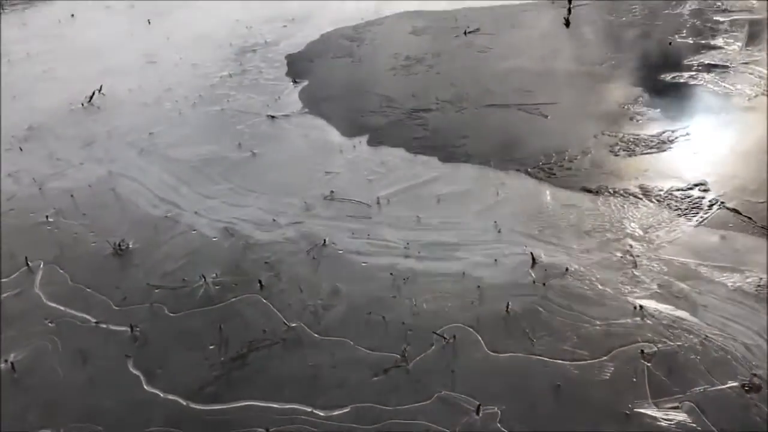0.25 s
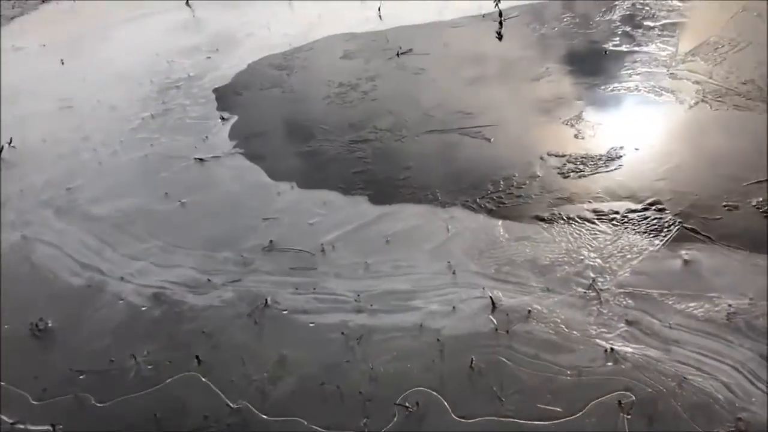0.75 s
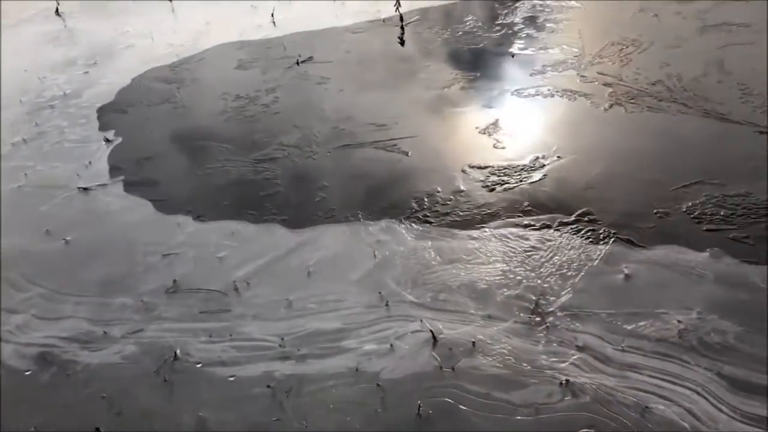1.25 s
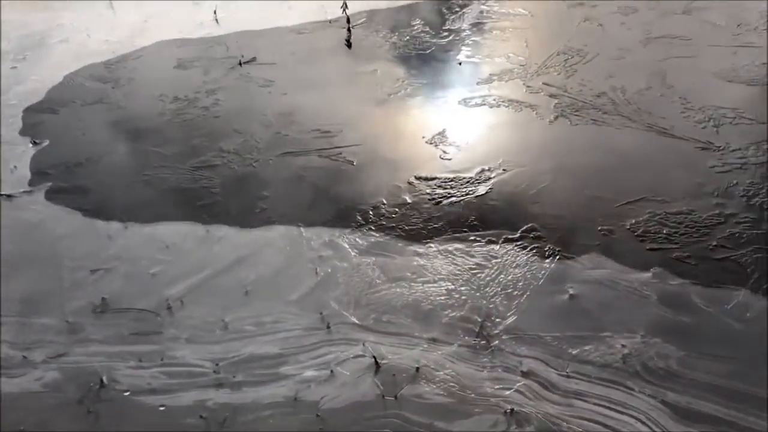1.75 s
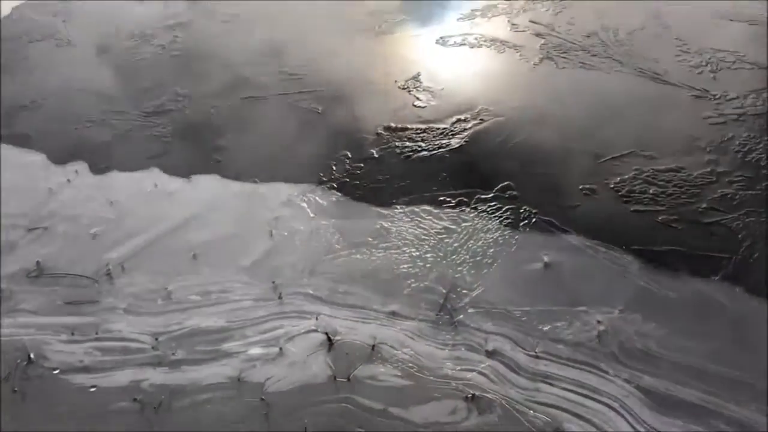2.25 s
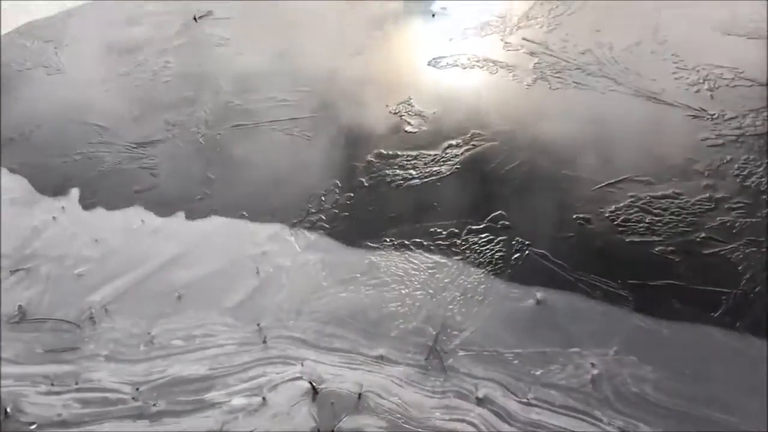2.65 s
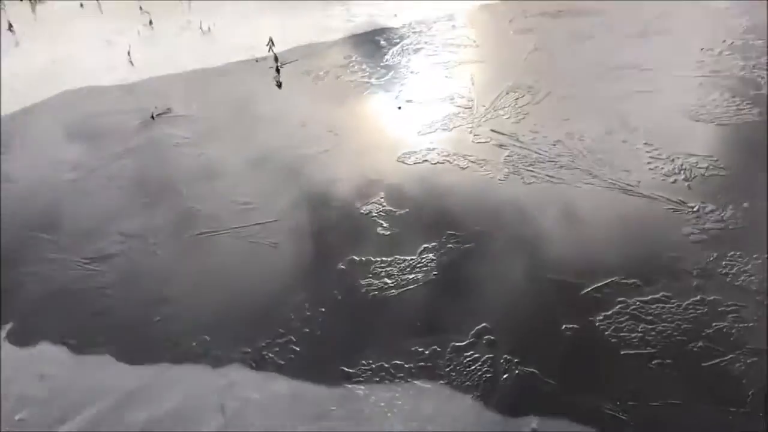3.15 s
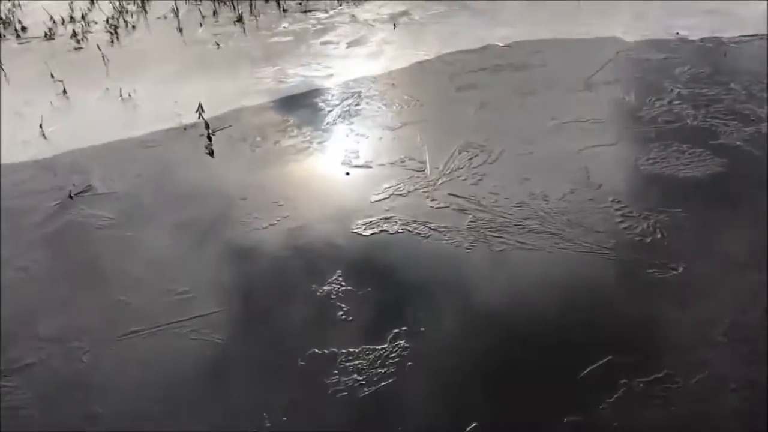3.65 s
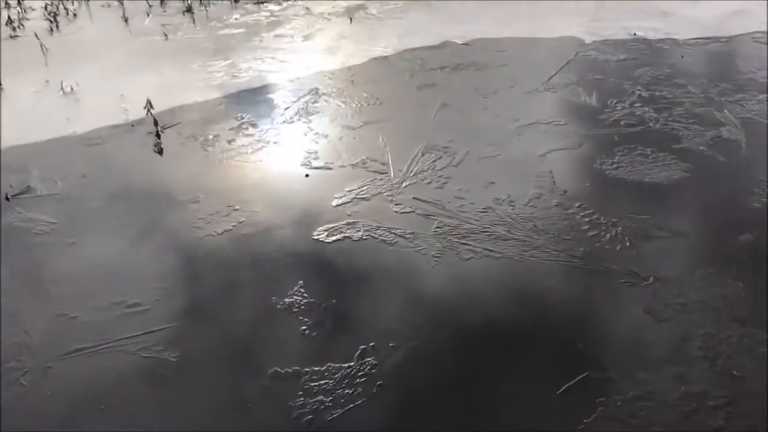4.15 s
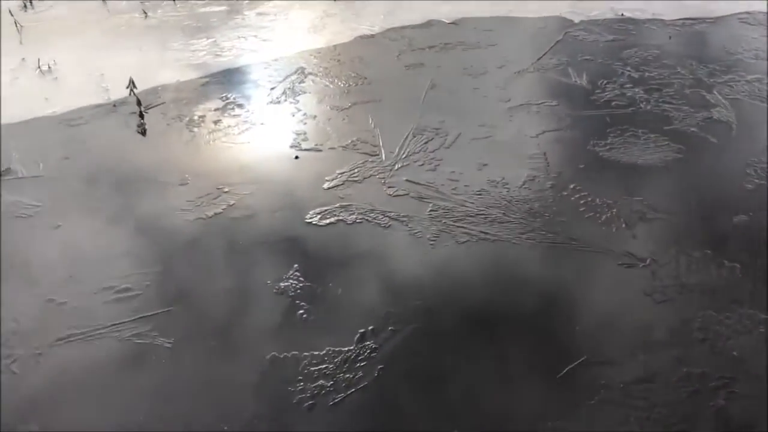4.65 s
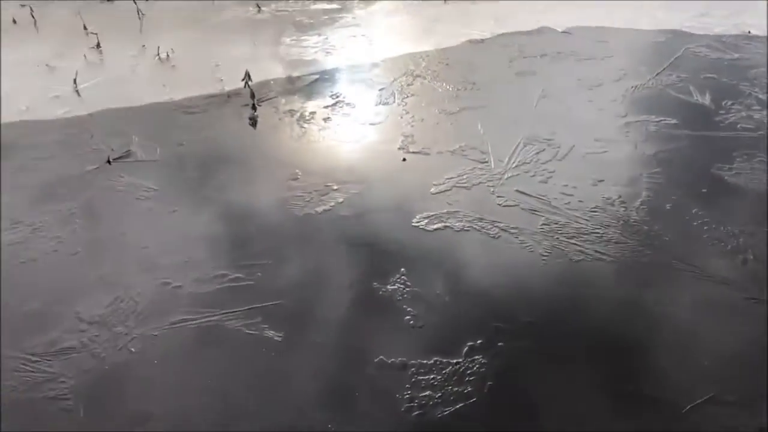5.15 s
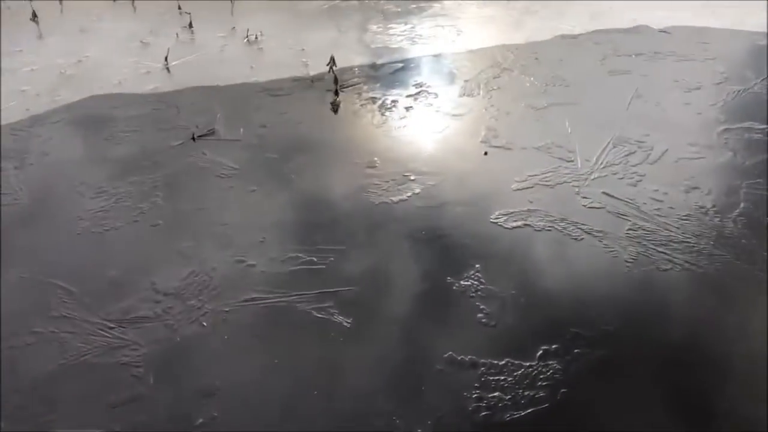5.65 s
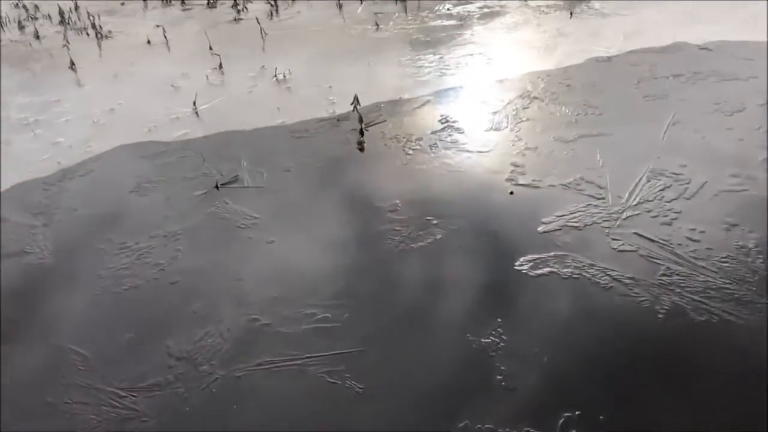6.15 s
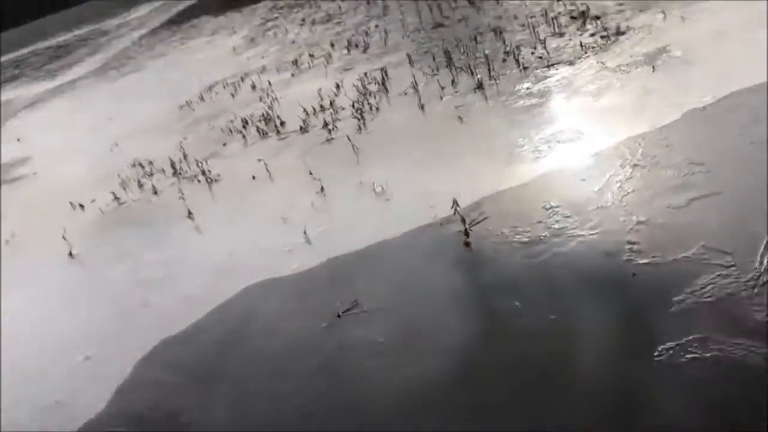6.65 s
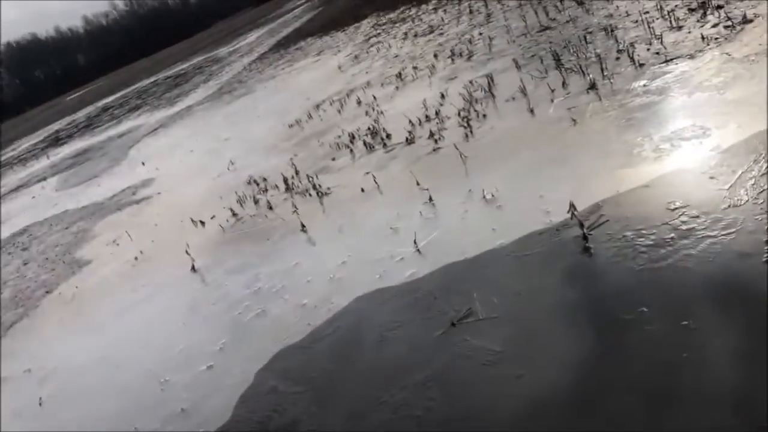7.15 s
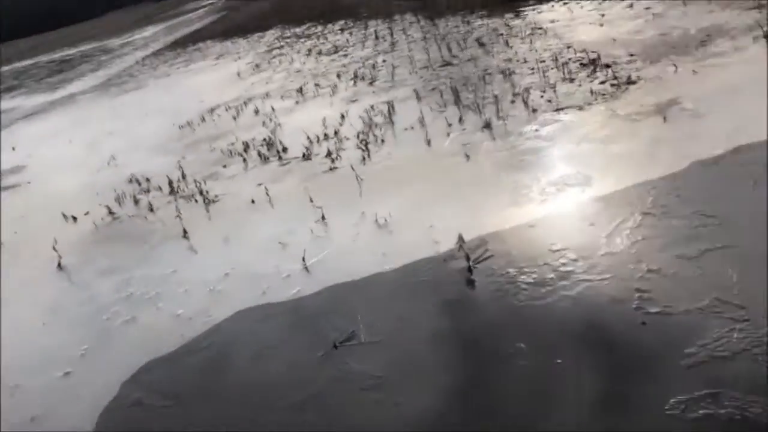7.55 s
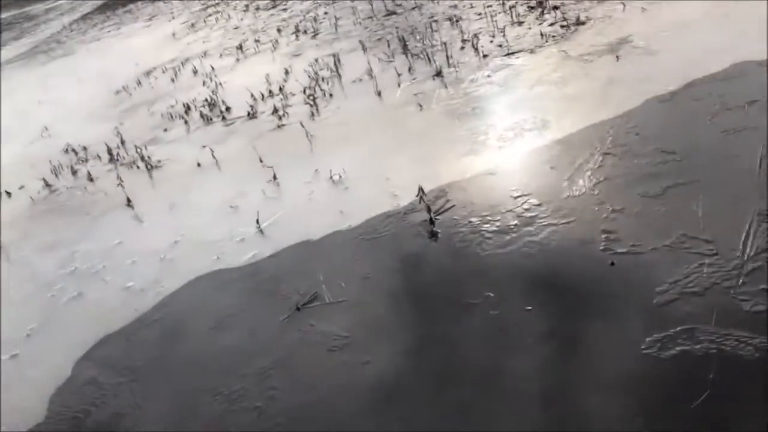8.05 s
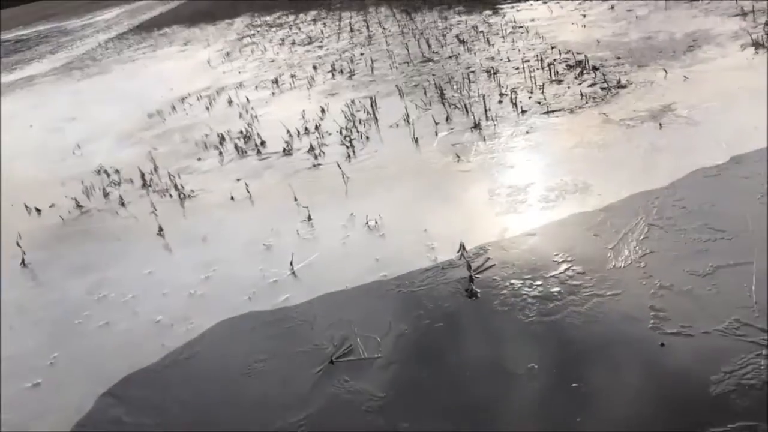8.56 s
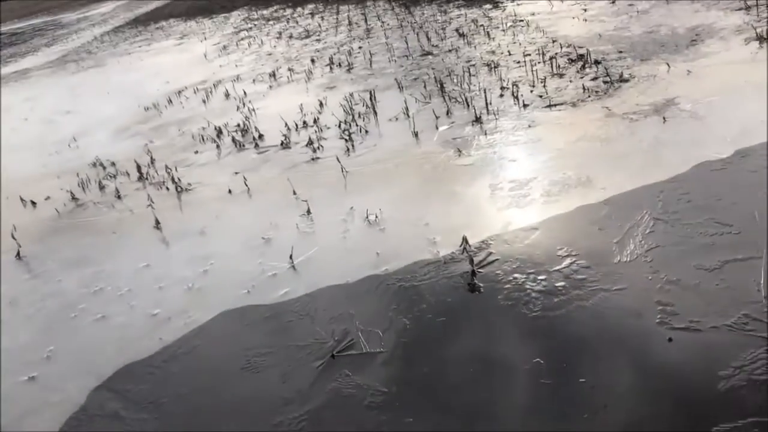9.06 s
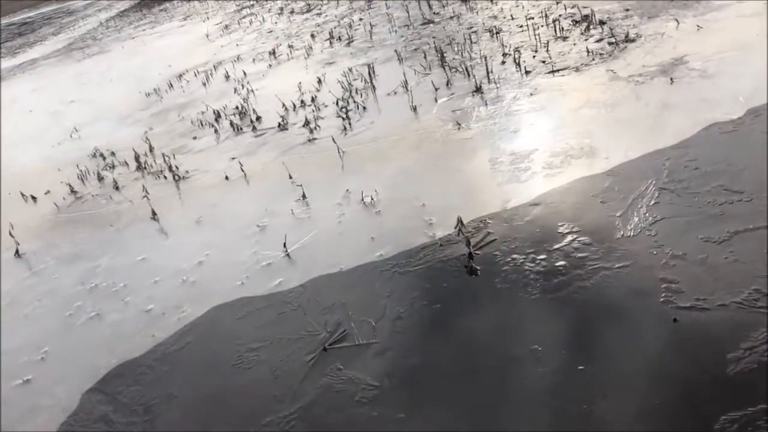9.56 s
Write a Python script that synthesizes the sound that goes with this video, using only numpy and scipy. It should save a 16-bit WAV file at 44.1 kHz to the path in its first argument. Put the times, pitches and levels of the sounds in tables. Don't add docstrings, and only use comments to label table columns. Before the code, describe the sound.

Close crunching and snapping of thin ice underfoot, with hollow thuds, ticking splinters, watery plops and light wind rumble on the microphone.

```python
import sys
import numpy as np
from scipy import signal
from scipy.fft import rfft, irfft, next_fast_len
from scipy.io import wavfile
from scipy.ndimage import uniform_filter1d

SR = 44100
rng = np.random.default_rng(int(sys.argv[2]) if len(sys.argv) > 2 else 0)


def attenuation_scalar(level_db):
    decades = np.asarray(level_db, float) / 20
    return 10 ** decades


def wav_out(sig):
    wavfile.write(sys.argv[1], SR, np.round(np.clip(np.atleast_2d(sig).T, -1, 1) * 32767).astype(np.int16))


N = 432621
REST_DB = -67.5

# (frequency [Hz], level [dB per Hz])
SHARD_SPECTRUM = [(880, -15.5), (1500, 1.5), (4170, -3.5), (5360, 1), (6490, 0.5), (15100, -5), (16000, 2),
                  (16500, -5.5)]


def evened(x):
    return x / np.sqrt(np.mean(x ** 2) + 1e-20)


def add(mix, s, sound):
    part = mix[round(s * SR):][:len(sound)]
    part += sound[:len(part)]


def curve(table):
    return attenuation_scalar(np.interp(np.arange(N) / SR, *np.transpose(table)))


def colour(x, points):
    size = next_fast_len(len(x))
    f, db = np.transpose(points)
    hz = np.fft.rfftfreq(size, 1 / SR) + 1
    gain = attenuation_scalar(np.interp(np.log(hz), np.log(f), db))
    return irfft(rfft(x, size) * gain, size)[:len(x)]


def drift(per_s):
    knots = np.tanh(0.7 * rng.standard_normal(4000))
    return evened(np.interp(np.arange(N) / SR * per_s, np.arange(len(knots)), knots))


def clicks(per_s, spread_db):
    size = attenuation_scalar(spread_db * np.minimum(rng.exponential(1, N), 5))
    sign = rng.choice([-1., 1.], N)
    return size * sign * (rng.random(N) < per_s / SR)


def grains(hz_lo, hz_hi, cycles, per_s, spread_db, glide, count):
    t, out = np.arange(2048) / SR, np.zeros(N)
    train = clicks(per_s, spread_db)
    which = rng.integers(0, count, N)
    for k, hz in enumerate(np.geomspace(hz_lo, hz_hi, count)):
        tone = np.sin(2 * np.pi * hz * t * (1 + glide * hz * t))
        wavelet = tone * np.exp(-3 * hz * t / cycles)
        out += signal.oaconvolve(train * (which == k), wavelet / np.linalg.norm(wavelet))[:N]
    return evened(out)


def crackle(per_s, spread_db, t60, clump_db, clumps_per_s, points):
    t = np.arange(1500) / SR
    snaps = clicks(per_s, spread_db) * attenuation_scalar(clump_db * drift(clumps_per_s))
    power = signal.oaconvolve(snaps ** 2, attenuation_scalar(-120 * t / t60))[:N]
    return evened(colour(np.sqrt(abs(power)) * rng.standard_normal(N), points))


def wind():
    # (time [s], level [dB])
    gusts = [(0.0, -33.5), (0.38, -54), (0.66, -36), (1.77, -50.5), (1.86, -40), (2.19, -50.5), (3.01, -52),
             (3.08, -47), (3.61, -50.5), (4.61, -47.5), (5.3, -48), (7.27, -48.5), (7.73, -58),
             (8.06, -42.5), (8.61, -50), (8.8, -31.5), (9.29, -52), (9.81, -44.5)]
    # (frequency [Hz], level [dB per Hz])
    rumble = [(12, -46), (20, -11), (43, 1.5), (65, 8), (121, -1), (146, -11), (250, -28), (320, -84.5)]
    lumps = attenuation_scalar(3.6 * drift(9))
    return curve(gusts) * evened(colour(rng.standard_normal(N), rumble) * lumps)


def field():
    # (frequency [Hz], level [dB per Hz])
    air = [(59, -52), (100, 11.5), (240, -24), (884, -8), (3940, -11), (12800, -31), (15100, -17),
           (16500, -67)]
    return attenuation_scalar(-59) * evened(colour(rng.standard_normal(N), air)) * attenuation_scalar(1.3 * drift(1.7))


def effort(wet):
    # (peak time [s], build-up [s], settling [s], effort [dB],
    # wetness of water over shards [dB])
    shifts = [(0.15, 0.2, 1, -51.5, 2.5), (0.82, 0.34, 0.53, -44.5, -2.5), (0.89, .1, 0.15, -49, 10),
              (1.44, 0.14, 0.46, -60.5, 15.5), (2.2, 0.044, .08, -61, 4), (2.02, 0.19, 0.39, -34.5, -2.5),
              (2.62, 0.44, 0.19, -47, 1.5), (2.74, 0.21, 0.37, -45.5, 4), (3.33, 0.48, 0.4, -39, 4.5),
              (3.47, 0.1, 0.83, -51.5, -3), (3.72, 0.14, 0.37, -60.5, 11.5), (4.1, 0.36, 1, -50.5, -3),
              (4.5, 0.23, 0.87, -62, 13.5), (4.93, 0.05, 0.22, -41.5, 0.5), (5.25, 0.22, 0.26, -29.5, 6),
              (5.42, 0.09, 0.27, -40.5, 0.5), (5.55, .2, 0.6, -45.5, -4), (6.09, 0.12, 0.11, -40, -24),
              (6.3, 0.46, 1, -50.5, 8.5), (6.796, 0.0037, 0.07, -33.5, -3), (6.901, 0.011, 0.15, -36.5, -3),
              (7.16, .03, .3, -52, -23), (7.4, 0.4, 0.9, -35.5, 4.5), (7.53, 0.064, 0.15, -41, 12),
              (7.9, 0.056, 0.24, -51, 9.5), (8.21, 0.2, 0.22, -50.5, 11), (8.52, 0.14, 1, -58, 13),
              (8.62, 0.13, .4, -47, 10.5), (8.9, 1, 0.77, -47.5, 8.5), (9.4, 0.77, 0.12, -55.5, 1)]
    range_db = 25
    t = np.arange(0, N + 64, 64) / SR
    power = attenuation_scalar(REST_DB) ** 2
    for s, build_s, settle_s, db, wet_db in shifts:
        away = np.where(t < s, (s - t) / build_s, (t - s) / settle_s)
        power = power + attenuation_scalar(db + wet * wet_db - range_db * away) ** 2
    return np.interp(np.arange(N) / SR, t, np.sqrt(power))


def shudder(per_s, spread_db):
    # (frequency [Hz], level [dB per Hz])
    flex = [(35, -57), (60, -12), (156, -6.5), (324, -8), (432, -12.5), (576, -5.5), (700, -7), (910, -57)]
    return evened(colour(grains(101.2, 488, 6.2, per_s, spread_db, -0.01, count=8), flex))


def flexing():
    rest_db, follows = -57.5, 0.3
    return attenuation_scalar(rest_db) * (effort(wet=0.88) / attenuation_scalar(REST_DB)) ** follows * shudder(420, 2.2)


def slosh():
    # (frequency [Hz], level [dB])
    small = [(1100, -3), (5000, -12)]
    # (frequency [Hz], level [dB per Hz])
    water = [(150, -35), (330, -14), (544, -17.5), (772, -7.5), (1100, -11.5), (1770, -21), (5000, -26.5),
             (6500, -62)]
    bubbles = grains(259.4, 4500, 15.0, 1700, 3.1, 0.00089, count=26) * attenuation_scalar(2.8 * drift(28))
    wash = rng.standard_normal(N) * attenuation_scalar(3.5 * drift(35))
    mixed = 0.74 * evened(colour(bubbles, small)) + 0.34 * evened(colour(wash, water))
    return effort(wet=1) * evened(mixed)


def shards():
    ticks = crackle(300, 4.7, 0.019, 10.0, 21, SHARD_SPECTRUM)
    tinkle = grains(1406, 12900, 12.0, 700, 5.5, 0.00046, count=14)
    fizz = crackle(1600, 3.2, 0.012, 3.2, 30, SHARD_SPECTRUM)
    return effort(wet=0) * evened(0.57 * ticks + 0.6 * tinkle + 0.84 * fizz)


def ring(peak_db, hz, cycles, glide, rise_s, wobble, rough, upper, upper_db):
    t = np.arange(len(wobble)) / SR
    age = t * hz / cycles
    turn = 2 * np.pi * np.cumsum(hz * (1 + glide * age)) / SR
    shape = attenuation_scalar(-60 * age) * (1 - np.exp(-t / rise_s))
    uneven = 1 + rough * evened(uniform_filter1d(wobble, int(SR / hz)))
    note = np.sin(turn) + attenuation_scalar(upper_db - 42 * age) * np.sin(upper * turn)
    return attenuation_scalar(peak_db) * note * uneven * shape / shape.max()


def plops():
    # (time [s], peak [dB], pitch [Hz])
    pops = [(0.155, -42, 970), (0.191, -41, 1080), (0.258, -38, 584), (0.401, -38, 876), (1.436, -40, 790),
            (2.054, -25, 1750), (2.107, -36, 1600), (2.749, -33.5, 810), (2.916, -36.5, 903),
            (3.315, -33, 790), (3.361, -25.5, 617), (3.395, -21.5, 934), (4.464, -43, 593),
            (4.551, -40.5, 950), (5.363, -27.5, 960), (5.664, -35, 1145),
            (6.178, -35, 793), (6.25, -33, 1005), (6.397, -36, 950), (6.429, -27, 736),
               (6.466, -34.5, 737), (6.628, -31, 1014), (7.309, -13.5, 1240), (7.342, -14, 1950),
               (7.388, -16.5, 1010), (7.488, -23, 590), (7.548, -17.5, 796), (7.595, -27, 925),
               (7.644, -32, 940), (7.806, -40, 418), (7.938, -29, 600), (8.29, -30.5, 1040),
               (8.484, -33, 877), (8.575, -35.5, 1060), (8.652, -31, 1240), (8.687, -36, 617),
               (8.822, -35, 830), (8.865, -28, 937), (8.9235, -25, 1370), (8.938, -22, 1056),
               (8.979, -28, 960), (9.417, -29.5, 599), (9.526, -34.5, 324), (9.682, -40, 620)]
    out = np.zeros(N)
    for s, db, hz in pops:
        noise = rng.standard_normal(8192)
        add(out, s, ring(db, hz, 35.7, 0.14, 0.00054, noise, 0.97, 2.0, -16.0))
    return out


def pings(rows, bend_per_s, rise_s):
    t, out = np.arange(8192) / SR, np.zeros(N)
    for s, db, hz, t60 in rows:
        shape = attenuation_scalar(-60 * t / min(t60, 130 / hz)) * (1 - np.exp(-t / rise_s)) ** 2
        tone = np.sin(2 * np.pi * hz * t * (1 + bend_per_s * t))
        add(out, s, attenuation_scalar(db - 1.5) * shape / shape.max() * tone)
    return out


def pockets():
    # (time [s], peak [dB], pitch [Hz], t60
    # [s])
    hollows = [(0.411, -43, 1290, 0.024), (0.745, -17, 199.5, 0.2), (1.433, -28, 271, 0.03),
               (1.915, -17.5, 333, 0.041), (2.002, -34, 1150, 0.063), (2.205, -31, 1070, 0.012),
               (2.716, -34, 336, 0.061), (3.077, -17, 294, 0.03), (3.184, -20, 996, 0.029),
               (3.216, -30, 1270, 0.11), (3.315, -24, 820.0, 0.016), (3.36, -18.5, 1190, 0.014),
               (3.44, -33, 260.0, 0.078), (3.571, -37.5, 1190, 0.017), (3.722, -35.5, 1080.0, 0.02),
               (3.971, -39, 1320, 0.015), (4.148, -39, 920, 0.024), (4.466, -30.5, 420, 0.013),
               (4.534, -38, 830, 0.018), (4.623, -42, 1100, 0.025), (4.888, -28, 295, 0.19),
               (5.088, -10.5, 261, 0.018), (5.287, -13, 255, 0.026), (5.323, -26, 1030.0, 0.036),
               (5.346, -23, 258, 0.03), (5.362, -26, 927, 0.027), (6.161, -35.5, 781, 0.192),
               (6.165, -30.5, 247, 0.033), (6.179, -32.5, 895, 0.029), (6.252, -34, 262, 0.044),
               (6.429, -26, 1340, 0.018), (7.228, -28.5, 260.0, 0.16), (7.271, -19, 305, 0.018),
               (7.453, -29, 847, 0.27), (7.644, -23.5, 940, 0.02), (7.708, -40, 850, 0.11),
               (7.75, -31, 1400, 0.023), (7.967, -32, 337, 0.11), (7.973, -28, 292, 0.03),
               (8.482, -35.5, 457, 0.091), (8.571, -36, 388, 0.35), (8.686, -24.5, 1290, 0.016),
               (8.762, -24, 327, 0.018), (8.771, -21, 312, 0.042), (8.838, -33, 850, 0.16),
               (8.938, -30, 1034, 0.071), (8.976, -37, 396, 0.14), (9.089, -30, 453, 0.015),
               (9.423, -35, 334, 0.022)]
    return pings(hollows, bend_per_s=1.3, rise_s=0.003)


def chips():
    # (time [s], peak [dB], pitch
    # [Hz], t60 [s])
    loose = [(0.661, -19, 6040, 0.018), (0.728, -29, 3790.0, 0.024), (1.845, -16, 2240, 0.04),
             (1.854, -34, 4740.0, 0.084), (2.105, -32, 4740.0, 0.018), (2.107, -32, 1580, 0.06),
             (2.618, -42, 3950, 0.072), (3.081, -18, 5340, 0.072), (3.12, -30, 1780, 0.024),
             (3.137, -32, 4400, 0.024), (3.279, -35, 3700.0, 0.018), (3.377, -40, 3900, 0.108),
             (3.48, -33, 1470, 0.018), (4.738, -42, 1660, 0.024), (5.078, -28, 4100, 0.034),
             (5.079, -28, 2820, 0.06), (5.165, -25, 4050.0, 0.018), (5.246, -22, 4480.0, 0.12),
             (5.439, -37, 5210.0, 0.018), (5.47, -39, 5800, 0.018), (6.175, -31.5, 1810.0, 0.018),
             (6.33, -40, 5500, 0.018), (6.716, -26, 6200, 0.052), (6.729, -22, 2490, 0.026),
             (6.909, -40, 3920.0, 0.024), (7.144, -16.5, 2400, 0.024), (7.31, -24, 3470, 0.04),
             (7.38, -26, 5940.0, 0.018), (7.445, -35, 2360, 0.03), (7.533, -39, 3100.0, 0.024),
             (7.591, -30, 1750, 0.024), (7.831, -40, 2110.0, 0.022), (7.936, -35, 5600, 0.016),
             (7.936, -35, 1640, 0.018), (8.239, -36, 4260.0, 0.024), (8.577, -35, 2100, 0.022),
             (8.598, -30.5, 2730, 0.022), (9.084, -28.5, 2310, 0.015), (9.373, -40, 2050, 0.081)]
    # (time [s], peak [dB], pitch [Hz])
    flakes = [(2.011, -22, 2320), (2.034, -25, 5100), (2.053, -28, 3770), (2.155, -36, 3200),
              (2.188, -38, 3900), (2.194, -32, 1040), (2.244, -36, 1350), (3.348, -21, 2600),
              (3.395, -20, 2430), (3.417, -32, 4600), (5.31, -23, 2290), (5.39, -40, 2300),
              (5.434, -34, 1720), (5.446, -36, 1800), (6.811, -28.5, 205), (6.847, -27.5, 186),
              (6.911, -21.5, 1970), (7.477, -24, 270), (7.51, -32, 261), (7.555, -18, 1480),
              (7.559, -23.5, 268), (8.606, -34, 500), (8.62, -31.5, 1420), (8.821, -34, 4220),
              (8.789, -26.5, 300), (0.617, -22.5, 210), (2.588, -32.5, 312), (2.939, -29, 1020),
              (3.047, -35, 477), (6.627, -32, 1400), (5.198, -20.5, 330), (5.208, -19, 520),
              (5.01, -34, 150)]
    decaying = [(s, db, hz, 0.0059 + 15 / hz) for s, db, hz in flakes]
    return pings(loose + decaying, bend_per_s=0.15, rise_s=0.0012)


def breaks():
    # (start [s], rise [s], fall [s], force [dB], weight of boom over shatter [dB])
    plunges = [(0.622, 0.041, 0.068, -26, 4.5), (0.69, 0.012, 0.15, -20.5, -9.5),
               (0.719, 0.073, 0.024, -26, 5.5), (1.424, 0.0087, 0.046, -34.5, 4.5),
               (1.842, 0.0037, 0.089, -15.5, -5.5), (1.896, 0.015, 0.13, -27.5, -7.5),
               (2.0, 0.018, 0.016, -27, -4.5), (3.062, 0.0045, 0.1, -12.5, -4.5),
               (3.177, 0.015, 0.071, -27.5, 2), (4.868, 0.044, 0.023, -16, -10),
               (5.059, 0.023, 0.031, -17.5, -3), (5.164, 0.058, 0.015, -18.5, -1.5),
               (5.24, 0.0095, 0.028, -15, -5), (5.255, 0.013, 0.019, -30, 6),
               (6.699, 0.022, 0.04, -21.5, -6.5), (7.13, 0.0052, 0.019, -17, -3),
               (7.265, 0.01, 0.045, -14.5, -20), (7.275, 0.028, 0.082, -19, 0),
               (7.36, 0.023, 0.1, -26.5, -31)]
    # (frequency [Hz], level [dB per Hz])
    wet_spectrum = [(300, -11), (550, 11), (1200, 8.5), (2400, -2.5), (3500, -7.5)]
    rise_db, fall_db, fall_curve = 18.5, 25, 1.3
    last = 1.7
    crunch_db, crunch_follows = -3.5, 0.76
    lasts = np.array([[1], [1.57], [1.32]])
    splinters = grains(2260, 17300, 9.4, 2500, 1.9, 0.001, count=12)
    shatter = evened(crackle(1500, 1.8, 0.013, 2.8, 120, SHARD_SPECTRUM) + 0.7 * splinters)
    crunch = crackle(700, 2.4, 0.013, 0.79, 60, wet_spectrum)
    boom = shudder(260, 2.1)
    layers, out = np.array([shatter, crunch, boom]), np.zeros(N)
    for s, rise_s, fall_s, db, weight_db in plunges:
        t = np.arange(0, rise_s + last * fall_s, 1 / SR)
        rise = np.maximum(1 - t / rise_s, 0)
        fall = np.maximum(t - rise_s, 0) / (fall_s * lasts)
        peak_db = db + np.array([[0], [crunch_db + crunch_follows * weight_db], [weight_db]])
        gains = attenuation_scalar(peak_db - rise_db * rise - fall_db * fall ** fall_curve)
        add(out, s, (gains * layers[:, round(s * SR):][:, :len(t)]).sum(0))
    return out


def bend(x, lag_s):
    hz = np.fft.rfftfreq(len(x), 1 / SR)
    return irfft(rfft(x) * np.exp(-4j * np.pi * lag_s * np.sqrt(1000 * hz)), len(x))


def crack(peak_db, dull_db, shard_hz, scatter, lag):
    t = np.arange(len(scatter)) / SR
    t60 = 0.045 * attenuation_scalar(0.12 * (peak_db + 26.5))
    jerks = attenuation_scalar(4.07 * evened(uniform_filter1d(scatter[::-1], 70))) * (1 - np.exp(-t / 0.00012))
    bright = 0.054 * scatter * attenuation_scalar(-60 * t / (1.1 * t60))
    dark = 0.06 * uniform_filter1d(scatter, 6) * attenuation_scalar(-60 * t / (1.8 * t60))
    split = jerks * (bright + dark)
    split[0] = 0.85
    tone = [(300, dull_db + 3.0), (900, dull_db + 6.0), (2100, dull_db + 5.5), (0.94 * shard_hz, -2.5),
            (shard_hz, 5.5), (1.35 * shard_hz, -2.5), (18000, -1.5)]
    lag_s = 0.001 + 0.001 * lag
    shard = 0.083 * np.sin(2 * np.pi * shard_hz * t) * attenuation_scalar(-60 * t * shard_hz / 60)
    return attenuation_scalar(peak_db + 8.5) * (bend(colour(split, tone), lag_s) + shard)


def cracks():
    # (time [s], peak [dB], dullness of mid over treble [dB], shard pitch [Hz])
    splits = [(0.6444, -11, -12, 13000), (0.6583, 1.5, -14, 10500), (0.6956, -14, -22, 3520),
              (0.736, -1, -49, 11800), (0.7784, -5, -23, 6900), (1.8486, -0.5, -18, 6000),
              (1.8694, 0, -22, 7300), (1.918, -4, -26, 10700), (1.9928, -12.5, -5.5, 3600),
              (2.0519, -10.5, -4, 3720), (3.0657, -4, -29, 5270), (3.1812, -11.5, -15, 2820),
              (3.2628, -11.5, -17, 7660), (3.348, -15, -6, 2740), (3.3773, -14, -2.5, 3320),
              (3.3955, -16, -1, 2960), (4.867, -15.5, -8, 4930), (4.8831, -0.5, -5, 7400),
              (5.1657, -11, -20, 6040), (5.1887, -1, 0, 5660), (5.2204, 1, -3.5, 3460),
              (5.229, -5, -28, 4260), (5.244, 3.5, -27, 5800), (5.2807, -2, -13, 4580),
              (6.7881, -14.5, -7, 5900), (6.9106, -18.5, 2.5, 6300), (7.0175, -11, -2.5, 3360),
              (7.1008, -9, -1.5, 4530), (7.1334, -6.5, 1, 5950), (7.2668, -10.5, 5.5, 3830)]
    # (time [s], peak [dB], shard pitch [Hz])
    hairlines = [(0.8163, -14, 3220), (0.9365, -22.5, 3580), (1.216, -37, 4630), (1.3402, -28.5, 10900),
                 (1.718, -24, 11500), (2.62, -16, 10000), (2.746, -23.5, 2760), (2.7866, -22.5, 6730),
                 (3.5339, -38, 3500), (3.601, -32, 3720), (4.06, -37, 9300), (4.081, -20, 8400),
                 (4.143, -24.5, 4700), (4.172, -28, 5160), (4.33, -36, 5070), (4.8205, -23.5, 3050),
                 (5.06, -17, 4670), (5.078, -1.5, 7800), (5.5416, -24, 5460), (5.576, -26.5, 5630),
                 (5.765, -32, 5930), (1.476, -29, 4500), (6.059, -24.5, 9680), (6.0895, -23, 8600),
                 (6.553, -27.5, 2750), (6.7196, -13, 8250), (7.995, -31, 4570), (6.9298, -23, 9000),
                 (8.33, -30.5, 5900), (9.084, -23.5, 3460)]
    # (time [s], peak [dB], dullness of mid over treble [dB])
    wet_snaps = [(1.4332, -18, -15), (1.61, -38, 5.5), (2.106, -28, -18), (2.1767, -27, -0.5),
                 (2.5106, -36, 4.5), (2.726, -27, 1.5), (2.94, -25.5, -1.5), (3.418, -23, 1),
                 (3.479, -25.5, 3), (3.662, -26.5, -2), (3.9711, -27.5, -0.5), (4.4976, -28, -22),
                 (5.4535, -24, 0), (6.1738, -24, -1), (0.9957, -37, 9), (6.677, -18.5, 1.5),
                 (6.875, -29, 5), (6.893, -18, -5), (6.9588, -22.5, -4), (7.5457, -33, 13.5),
                 (7.75, -18.5, -34), (7.885, -22, -6), (7.9375, -28, 8), (8.239, -29, 2),
                 (6.8203, -22, -14), (8.5982, -23.5, 2), (8.6827, -41, 20.5), (8.7598, -18.5, 2),
                 (9.066, -17.5, -10), (9.416, -41, 23.5)]
    ticks = [(s, db, -12, hz) for s, db, hz in hairlines]
    snaps = [(*row, rng.uniform(2800, 6520)) for row in wet_snaps]
    out = np.zeros(N)
    for s, *row in splits + ticks + snaps:
        noise = rng.standard_normal(4096)
        add(out, s, crack(*row, noise, min(abs(noise[0]), 1)))
    return out


def thumps():
    # (time [s], peak [dB], pitch [Hz])
    slabs = [(0.658, -11.5, 198.5), (0.729, -14.5, 156), (1.843, -13.5, 182.3), (1.915, -19.5, 292),
             (2.349, -35, 120), (2.556, -33.5, 260), (2.751, -30.5, 225), (3.069, -9, 266),
             (3.19, -16.5, 150), (3.396, -25, 227), (3.428, -28.5, 296), (4.824, -20.5, 166),
             (4.904, -17, 253), (5.087, -15.5, 267), (5.145, -35, 208), (5.225, -11, 225),
             (5.257, -18, 184), (5.34, -21, 206), (6.611, -24.5, 214), (6.678, -21, 180), (7.137, -20, 255),
             (7.28, -21, 270), (7.393, -36, 366), (7.476, -40, 272), (7.548, -29, 274), (7.804, -32, 400),
             (8.598, -25, 460), (8.762, -22.5, 297), (8.937, -31, 348), (9.423, -32.5, 310)]
    out = np.zeros(N)
    for s, db, hz in slabs:
        noise = rng.standard_normal(8192)
        add(out, s, ring(db, hz, 23.4, -0.15, 0.00027, noise, 0.97, 2.23, -16.5))
    return out


def ground(x):
    t = np.arange(4000) / SR
    tail = rng.standard_normal(len(t)) * attenuation_scalar(-60 * t / 0.13) * (t > 0.003)
    return attenuation_scalar(-14.5) * signal.oaconvolve(x, tail / np.linalg.norm(tail))[:N]


def scene():
    # (frequency [Hz], level [dB])
    edge = [(55, -40), (115, 0), (15880, 0), (16050, -45)]
    feet = flexing() + slosh() + shards() + plops() + breaks() + cracks() + thumps()
    notes = pockets() + chips()
    return (colour(feet + ground(feet) + notes + field(), edge) + wind())[None]


def low_pass(x):
    return signal.sosfilt(signal.butter(12, 16980, fs=SR, output="sos"), x)


def record(dry):
    # (frequency [Hz], level [dB])
    top = [(16750, 0), (17000, -60)]
    limited = 0.79 * np.tanh(dry[0] / 0.76)
    return low_pass(colour(limited, top)[None])


dry = scene()
out = record(dry)
wav_out(out)
```